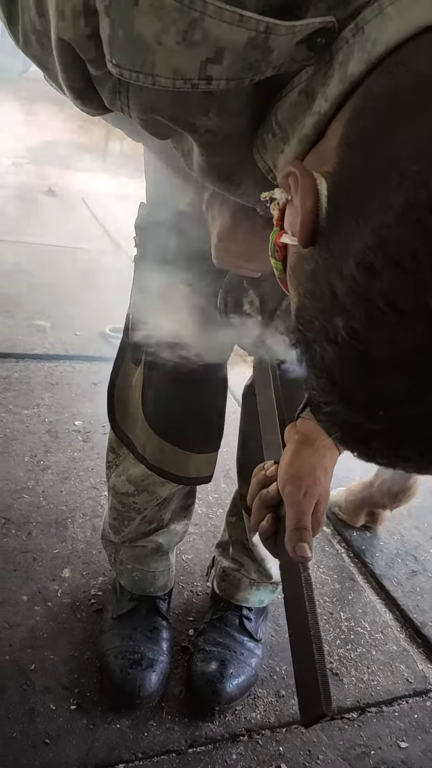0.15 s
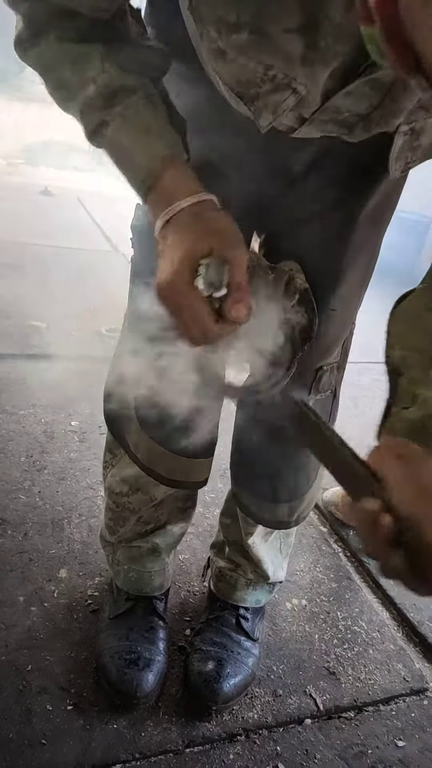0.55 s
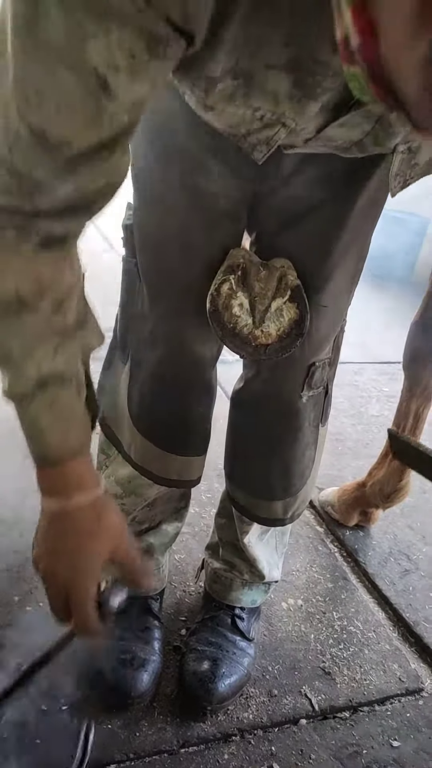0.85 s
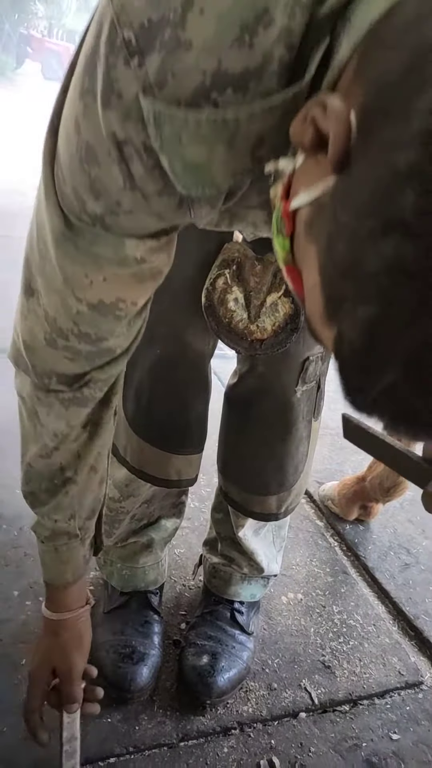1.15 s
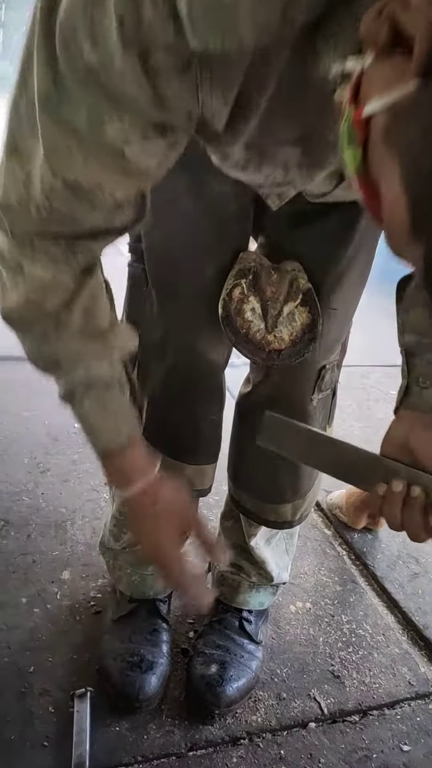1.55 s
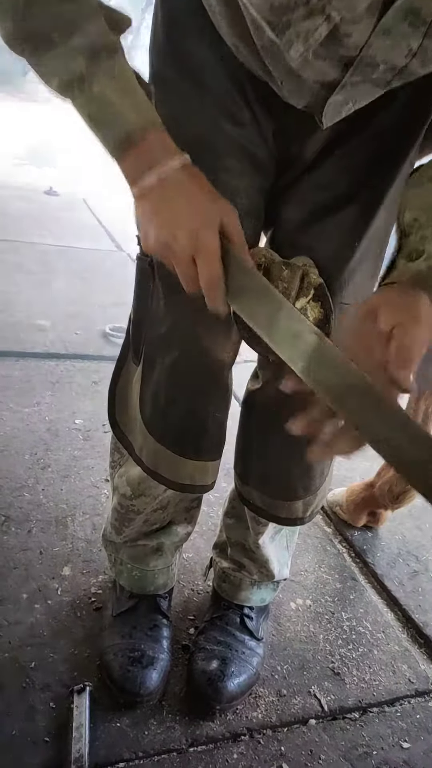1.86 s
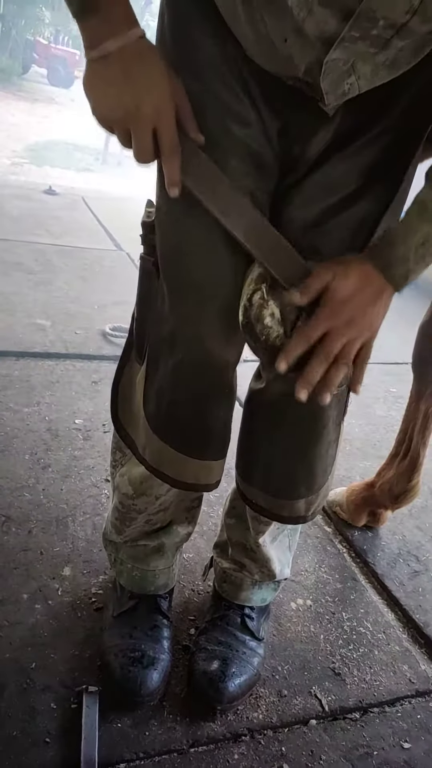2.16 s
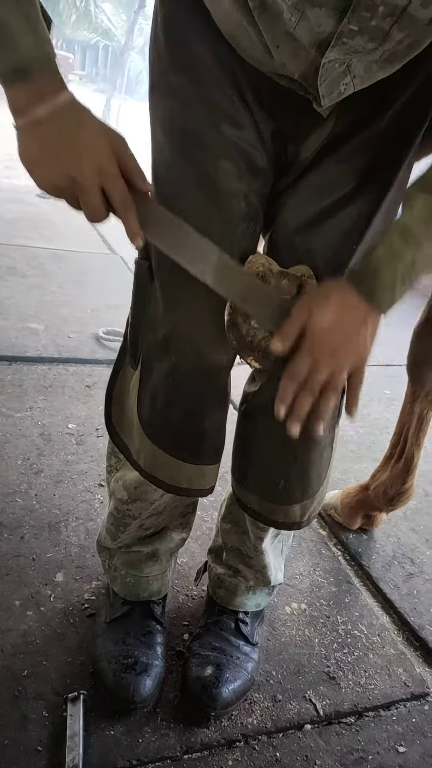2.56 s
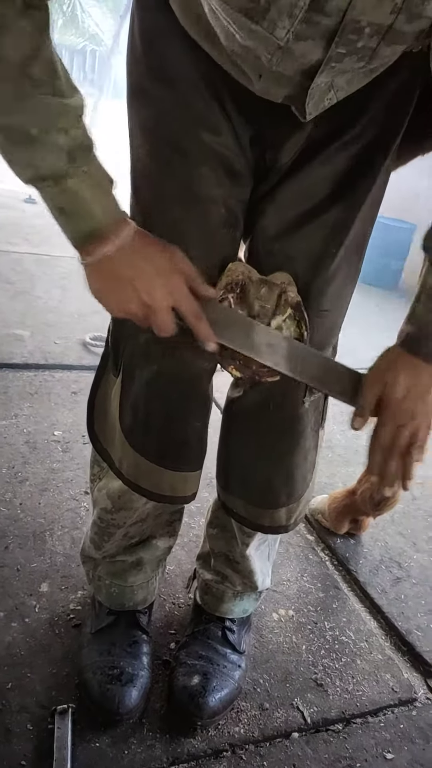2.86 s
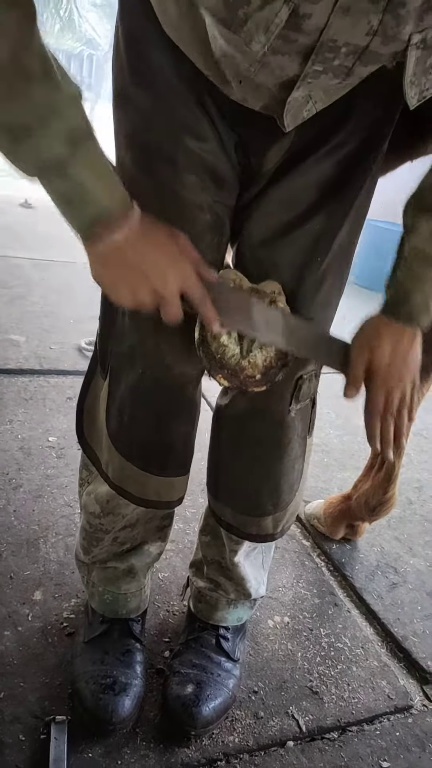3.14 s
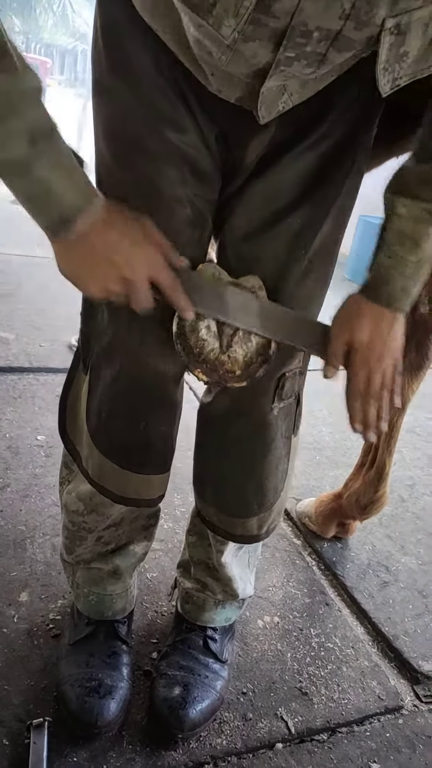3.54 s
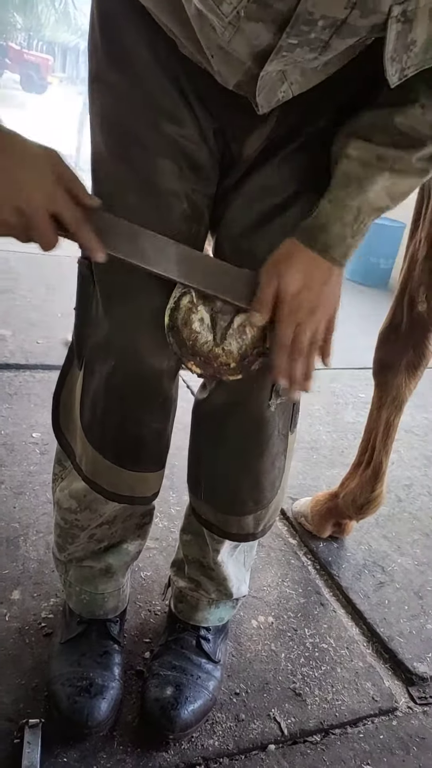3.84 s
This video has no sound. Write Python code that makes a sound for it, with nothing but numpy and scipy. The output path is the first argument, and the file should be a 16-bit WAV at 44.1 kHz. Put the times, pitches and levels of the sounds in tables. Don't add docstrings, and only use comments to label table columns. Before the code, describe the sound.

A rasp scrapes a horse's hoof in strokes after a hot shoe sizzles, under buffeting wind

```python
import sys
import numpy as np
from scipy import signal
from scipy.fft import rfft, irfft
from scipy.io import wavfile
from scipy.ndimage import uniform_filter1d

SR = 44100
rng = np.random.default_rng(int(sys.argv[2]) if len(sys.argv) > 2 else 0)


def digitize_waveform(pressure):
    field = np.atleast_2d(pressure).T
    bounded = np.clip(field, -1, 1)
    quanta = np.round(bounded * 32767).astype(np.int16)
    wavfile.write(sys.argv[1], SR, quanta)


def decibels_to_gain(level_db):
    exponent = np.asarray(level_db, float) / 20
    return 10 ** exponent


N = 176400
RASP_PAN_DB = 1.96


def unit(x):
    return x / np.sqrt(np.mean(x ** 2))


def curve(points, hz):
    p = np.array(points, float)
    return np.interp(np.log(hz + 1), np.log(p[:, 0]), p[:, 1])


def colour(x, points):
    gain = decibels_to_gain(curve(points, np.fft.rfftfreq(N, 1 / SR)))
    return irfft(rfft(x) * gain, N)


def ring(x, hz, width_hz):
    b, a = signal.iirpeak(min(hz, .45 * SR), hz / width_hz, SR)
    return signal.lfilter(b, a, x)


def walk(rate_hz):
    hold = int(SR / rate_hz)
    levels = np.repeat(rng.standard_normal(N // 50), hold)[:N]
    return unit(uniform_filter1d(uniform_filter1d(levels, hold), hold))


def grains(spread_db, per_s):
    chance = rng.random((3, N))
    struck = chance[0] < per_s / SR
    size = decibels_to_gain(-spread_db * np.log(chance[2] + 3e-3))
    return unit(struck * np.sign(chance[1] - .5) * size)


def ports(x, pan_db, lag_samples=3.73):
    f = np.fft.rfftfreq(N)
    treble = decibels_to_gain(4.5 * f * SR / 12000)
    late = irfft(rfft(x) * np.exp(-2j * np.pi * f * lag_samples) * treble, N)
    return np.array([late * decibels_to_gain(pan_db / 2), x * decibels_to_gain(-pan_db / 2)])


def slaps(events):
    half_s, width_share, trim_db = 0.0097, 0.55, -1.5
    out = np.zeros(N + 4000)
    swell = np.exp(-((np.arange(4000) - 2000) / SR / half_s) ** 2)
    for (s, db, hz), noise in zip(events, rng.standard_normal((len(events), 4000))):
        eddy = ring(noise, hz, width_share * hz)
        eddy = ring(ring(eddy, hz, 2 * hz), hz, 2 * hz)
        eddy = eddy / np.sqrt(2 * np.sum((swell * eddy) ** 2) / np.sum(swell ** 2))
        start = int(s * SR)
        out[start:start + 4000] += decibels_to_gain(db + trim_db) * swell * eddy
    return out[2000:N + 2000]


def port_wind(gusts, lull_db, eddies, wind_db, bursts):
    steepen_per_oct, brightest_db = 0.1, -4
    flicker_hz, flicker_db_per_oct, own_db = 60, 0.74, 1.8
    port_limit, port_hz = 1.68, 1017
    t, hz = np.arange(N) / SR, np.fft.rfftfreq(N, 1 / SR)
    coarse = t[::100]
    power = decibels_to_gain(2 * lull_db)
    for s, half, db in gusts:
        power = power + decibels_to_gain(2 * db) * np.exp(-((coarse - s) / half) ** 4)
    gust_db = np.interp(t, coarse, 10 * np.log10(power))
    flicker = walk(flicker_hz)
    spectrum = rfft(rng.standard_normal(N)) * decibels_to_gain(curve(eddies, hz)) * (hz > 3)
    scale = np.sqrt(np.mean(irfft(spectrum * (hz > 30), N) ** 2))
    out = 0
    for octave in range(-3, 6):
        share = np.clip(1 - np.abs(np.log2((hz + 1) / 50) - octave), 0, 1)
        up = max(octave, 0)
        db = gust_db + steepen_per_oct * up * (np.minimum(gust_db, brightest_db) + 17)
        db = db + flicker_db_per_oct * up * flicker + own_db * walk(24.01)
        band = irfft(spectrum * share, N)
        even = (np.mean(band ** 2) / uniform_filter1d(band ** 2, size=4000)) ** 0.54
        out = out + decibels_to_gain(db + wind_db) * even * band / scale
    pressed = port_limit * np.tanh((out + bursts) / port_limit)
    return signal.sosfilt(signal.butter(4, port_hz, fs=SR, output="sos"), pressed)


def wind():
    # (centre [s], half length [s], level [dB])
    gusts_left = [(0.075, 0.051, -17.5), (0.19, 0.091, -22), (0.33, 0.043, -17.5), (0.512, 0.065, -15),
                  (0.687, 0.084, -18), (0.872, 0.12, -23.5), (1.148, 0.02, -46), (1.293, 0.047, -43),
                  (1.467, 0.088, -30), (1.615, 0.072, -23.5), (1.862, 0.026, -23), (2.11, 0.12, -12),
                  (2.34, 0.083, -16), (2.513, 0.11, -16.5), (2.642, 0.038, -16.5), (2.765, 0.034, -10),
                  (2.919, 0.066, -16), (3.091, 0.073, -18), (3.334, 0.094, -17.5), (3.425, 0.018, -16.5),
                  (3.534, 0.07, -15.5), (3.726, 0.057, -18.5), (3.879, 0.048, -15.5), (4.03, 0.1, -18)]
    gusts_right = [(0.092, 0.031, -10.5), (0.214, 0.09, -18), (0.362, 0.069, -10), (0.471, 0.021, -7),
                   (0.526, 0.14, -23), (0.663, 0.022, -9), (0.76, 0.044, -15.5), (0.9, 0.05, -18),
                   (1.085, 0.029, -20.5), (1.213, 0.046, -24.5), (1.437, 0.14, -17.5), (1.748, 0.033, -48),
                   (1.93, 0.045, -9), (2.037, 0.041, -13.5), (2.201, 0.13, -13.5), (2.376, 0.055, -15),
                   (2.537, 0.094, -9.5), (2.753, 0.088, -11.5), (2.969, 0.084, -11), (3.082, 0.038, -6.5),
                   (3.213, 0.067, -14), (3.342, 0.061, -10), (3.494, 0.039, -14.5), (3.612, 0.043, -10.5),
                   (3.714, 0.059, -4), (3.89, 0.064, -19)]
    # (frequency [Hz], density [dB per Hz])
    eddies_left = [(6, 8), (20, -2.5), (50, -4), (110, -14.5), (240, -23.5), (500, -44), (1000, -47)]
    eddies_right = [(6, 3.5), (20, 0.5), (50, -0.5), (110, -6), (240, -17.5), (500, -35.5), (1000, -52)]
    # (centre [s], level [dB], pitch [Hz])
    slaps_left = [(0.511, -24, 187), (0.651, -21, 225), (0.915, -25, 218), (2.089, -13, 220),
                  (2.285, -16, 208), (2.627, -17, 193), (2.751, -20, 250), (2.936, -16.5, 257),
                  (3.057, -21, 211), (3.309, -16, 181), (3.48, -16, 197), (3.981, -21, 230)]
    slaps_right = [(0.083, -18, 201), (0.135, -10, 196), (0.262, -19.5, 300), (0.288, -17.5, 194),
                   (0.314, -10, 275), (0.361, -10.5, 185), (0.407, -19, 201), (0.436, -15, 215),
                   (0.457, -19, 222), (0.478, -24, 200), (0.655, -14.5, 188), (0.78, -13, 193),
                   (0.883, -19, 282), (0.949, -34, 187), (1.109, -22.5, 186), (1.232, -25, 185),
                   (1.361, -17, 185), (1.396, -22.5, 220), (1.44, -16, 190), (1.462, -18.5, 302),
                   (1.525, -24, 191), (1.916, -7.5, 287), (1.959, -8.5, 227), (2.063, -16, 200),
                   (2.167, -10.5, 208), (2.196, -14.5, 211), (2.233, -16, 230), (2.339, -12.5, 200),
                   (2.366, -20, 248), (2.471, -17, 204), (2.523, -8, 199), (2.577, -4.5, 217),
                   (2.622, -18.5, 196), (2.699, -24, 237), (2.752, -8.5, 210), (2.783, -17, 256),
                   (2.805, -18.5, 182), (2.888, -13, 188), (2.922, -15, 254), (2.958, -7.5, 183),
                   (3.002, -13.5, 236), (3.027, -11.5, 185), (3.061, -8.5, 283), (3.193, -11.5, 216),
                   (3.246, -15, 193), (3.309, -6.5, 224), (3.356, -9, 200), (3.474, -20, 185),
                   (3.513, -13, 236), (3.594, -10.5, 278), (3.666, -3.5, 232), (3.711, -6, 288),
                   (3.738, -5.5, 213), (3.775, -10, 242), (3.893, -16, 222)]
    # (centre [s], level [dB], pitch [Hz])
    more_slaps_right = [
        (0.385, -14.5, 300),
        (1.937, -11.5, 262),
        (3.105, -13.5, 300),
    ]
    bursts_left = slaps(slaps_left)
    bursts_right = slaps(list(slaps_right) + list(more_slaps_right))
    left = port_wind(gusts_left, -30.5, eddies_left, -0.5, bursts_left)
    right = port_wind(gusts_right, -30, eddies_right, 0, bursts_right)
    return np.array([left, right])


def yard():
    level_db, swell_db, waver_db, waver_hz = -38.5, .6, 2.0, 2.74
    # (frequency [Hz], density [dB per Hz])
    air_spectrum = [(200, 2), (600, 0), (1100, -5.5), (1900, -5.5), (2600, -9.5), (4500, -16.5),
                    (8300, -17.5), (16000, -24)]
    # (frequency [Hz], level [dB])
    hum_tones = [
        (1674, -54),
        (1895, -55),
    ]
    t = np.arange(N) / SR
    air = []
    for _ in range(2):
        hiss = unit(colour(rng.standard_normal(N), [(100, -49)] + list(air_spectrum)))
        air.append(hiss * decibels_to_gain(level_db + swell_db * walk(2.3)))
    hum = np.zeros(N)
    for hz, db in hum_tones:
        cycles = hz * t + np.cumsum(waver_hz * walk(5.2)) / SR
        hum = hum + decibels_to_gain(db + 0.5 + waver_db * walk(12)) * np.sin(2 * np.pi * cycles)
    return np.array(air) + ports(hum, 1.3, lag_samples=7.2)


def sizzle():
    pan_db, crackle_db, crackles_per_s, hoof_s = 2, 5, 2500, .9
    # (time [s], level [dB])
    swells = [(0, -45), (.42, -44), (.49, -38), (.55, -46), (.63, -51), (.8, -52), (.91, -42), (1.15, -63),
              (1.32, -42.5), (1.46, -37), (1.6, -46), (1.8, -59), (2.2, -70)]
    # (frequency [Hz], density [dB per Hz])
    steam = [(2000, -4.5), (4000, -1.5), (8300, 1.5), (16000, -5.5)]
    t = np.arange(N) / SR
    p = np.array(swells)
    level = decibels_to_gain(np.interp(t, p[:, 0], p[:, 1], right=-90) + 1.5 * walk(25.4))
    hiss = np.array([unit(colour(rng.standard_normal(N), steam)) for _ in range(2)])
    hiss = hiss * decibels_to_gain([[pan_db / 2], [-pan_db / 2]])
    crackle = ports(unit(colour(grains(crackle_db, crackles_per_s), steam)), 2.2)
    crackle = crackle * (t < hoof_s)
    return level * (hiss + 0.73 * crackle)


def ticks(events, hz, width_hz):
    repeat_s, repeat_db = .0016, -8
    tail_db, tail_t60_s = -26, .015
    out = np.zeros((2, N + 2000))
    for (s, db, pan_db), c in zip(events, rng.random((len(events), 4))):
        pan = np.array([pan_db, -pan_db]) / 2
        for k in range(3):
            i = int((s + 0.0013 + k * repeat_s * (.5 + c[k])) * SR)
            out[:, i] += decibels_to_gain(db + k * repeat_db * c[3] + pan)
    out = np.array([ports(out[0, :N], 0)[0], out[1, :N]])
    fade = np.exp(-np.log(1000) * np.arange(2000) / SR / tail_t60_s)
    tail = np.array([signal.fftconvolve(x, fade * rng.standard_normal(2000))[:N] for x in out])
    struck = out + decibels_to_gain(tail_db) * tail
    return 3.2 * ring(ring(struck, hz, width_hz), hz, 1.7 * width_hz)


def spits():
    # (time [s], peak [dB], left-right difference [dB])
    fat_spits = [(0.0324, -37, 3.0), (0.35, -26, 3.2), (0.4429, -38, 3.0), (0.4845, -24, 3.5),
                 (0.5134, -25, 3.0), (0.5644, -30, 1.0), (0.5747, -20.5, 5), (0.5947, -31, 3),
                 (0.5985, -26, 3.0), (0.6456, -28, 2.5), (0.6491, -30, 3), (0.6512, -27, 5.0),
                 (0.6574, -21, 6.0), (0.6704, -31, 2.0), (0.686, -28, 2.5), (0.7143, -27.5, 1.5),
                 (0.7332, -28, 1.0), (0.7434, -33, 2.5), (0.8302, -19, 1)]
    return ticks(fat_spits, 12200, 12600)


def clang():
    start_s, hz, db, t60_s = .115, 1170, -42, .35
    t = np.maximum(np.arange(N) / SR - start_s, 0)
    attack = np.minimum(t * 200, 1)
    return decibels_to_gain(db - 60 * t / t60_s) * attack * np.sin(2 * np.pi * hz * t)


def catches():
    # (time [s], peak [dB], left-right difference [dB])
    tooth_catches = [(2.158, -37, 1.5), (2.176, -21, -4), (2.261, -27, 9), (2.6643, -29, 4),
                     (2.9073, -29, 5), (3.0979, -32, 4.0), (3.1128, -15.5, -2), (3.2632, -29, 2),
                     (3.5344, -29, 2.5), (3.553, -24, 2.0), (3.8753, -26, 3), (3.894, -27, 0),
                     (3.929, -30, 2.5), (3.9442, -11.5, 1)]
    return ticks(tooth_catches, 9500, 5600)


def rasp():
    bite_share, hold_share = 0.43, .24
    drag_db, chatter_db, chatter_hz = -47.5, .7, 160
    patchy_db, patch_hz = 2, 41.3
    steel_near, steel_scatter, horn_scatter = 0.33, 0.76, 0.28
    # (start [s], length [s], steel hiss [dB], horn [dB], brightness [dB per octave])
    strokes = [(2.169, 0.037, -43, -46, -6), (2.219, 0.21, -36, -43, -6.5), (2.51, 0.12, -42.5, -47.5, 7),
               (2.616, 0.23, -35, -38, -5), (2.88, 0.17, -41.5, -41.5, -7), (3.047, 0.2, -35, -35, -2.5),
               (3.214, 0.18, -46, -44, -6), (3.327, 0.11, -41, -43.5, -8), (3.479, 0.16, -35.5, -33.5, -2),
               (3.656, 0.2, -44, -38, -3.5), (3.856, 0.17, -34, -32.5, -3)]
    # (frequency [Hz], width [Hz], level [dB])
    steel_modes = [
        (5160, 1100, -3.5),
        (7930, 4200, 11.5),
        (10600, 4800, 6),
        (13200, 1800, -1),
    ]
    # (frequency [Hz], width [Hz], level [dB])
    horn_modes = [
        (1615, 230, -7.5),
        (2580, 480, -4.5),
        (3014, 440, 1),
        (3456, 230, -4),
    ]
    t = np.arange(N) / SR
    steel, horn, bright = np.zeros(N), np.zeros(N), np.zeros(N)
    for s, length, steel_db, horn_db, bright_db in strokes:
        u = (t - s) / length
        rise, fall = u / bite_share, (1 - u) / (1 - bite_share - hold_share)
        push = np.clip(np.minimum(rise, fall), 0, 1)
        steel = steel + decibels_to_gain(steel_db) * push
        horn = horn + decibels_to_gain(horn_db) * push ** 1.2
        bright[t > s] = bright_db
    steel = steel + decibels_to_gain(drag_db) * (t > strokes[0][0])
    chatter = decibels_to_gain(chatter_db * walk(chatter_hz))

    def patches(modes, mid_hz, tilt):
        return [decibels_to_gain(db + patchy_db * walk(patch_hz) + bright * np.log2(f / mid_hz) * tilt)
                for f, w, db in modes]

    steel_gains = patches(steel_modes, 9000, 1.0)
    horn_gains = patches(horn_modes, 3000, 1.5)

    def rung(modes, gains, teeth):
        total = np.zeros(N)
        for (f, w, db), gain in zip(modes, gains):
            total = total + gain * ring(ring(teeth, f, 1.65 * w), f, 1.65 * w)
        return unit(total)

    def body():
        steel_ring = rung(steel_modes, steel_gains, grains(3.0, 2800))
        horn_ring = rung(horn_modes, horn_gains, grains(2.3, 1400))
        return chatter * np.array([steel * steel_ring, horn * horn_ring])

    near = ports(np.array([steel_near, 1]) @ body(), -1.4)
    far = np.array([np.array([steel_scatter, horn_scatter]) @ body() for _ in range(2)])
    return near + far * decibels_to_gain([[RASP_PAN_DB], [-RASP_PAN_DB]])


def bites():
    # (time [s], peak [dB])
    deep_bites = [(2.6956, -31), (2.7121, -30), (2.763, -30), (2.9276, -33), (3.096, -26), (3.1291, -27),
                  (3.168, -27), (3.3691, -24), (3.4718, -34), (3.4868, -29), (3.5126, -28), (3.534, -23),
                  (3.6933, -31), (3.7338, -34), (3.8709, -36), (3.9034, -27), (3.9034, -27), (3.9318, -26),
                  (3.944, -14)]
    return ticks([(s, db + 13.5, -RASP_PAN_DB) for s, db in deep_bites], 3000, 1260)


def scene():
    air = wind() + yard()
    hot_shoe = sizzle() + spits()
    rasping = catches() + rasp() + bites()
    return air + hot_shoe + clang() + rasping


def roll_off(x):
    return signal.sosfilt(signal.butter(12, 16530, fs=SR, output="sos"), x)


def record(dry):
    cut = signal.sosfilt(signal.ellip(10, .3, 60, 15750, fs=SR, output="sos"), dry)
    return roll_off(np.clip(cut, -1, 1))


dry = scene()
out = record(dry)
digitize_waveform(out)
```